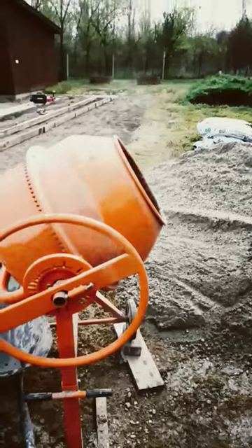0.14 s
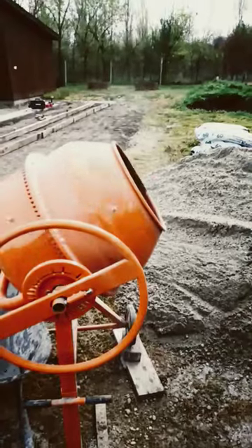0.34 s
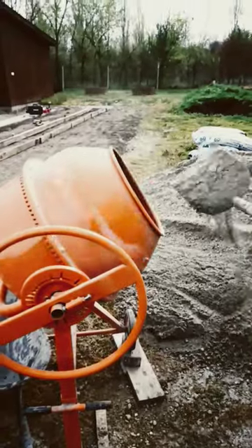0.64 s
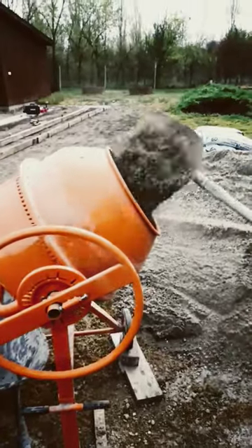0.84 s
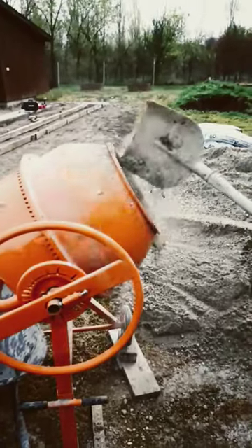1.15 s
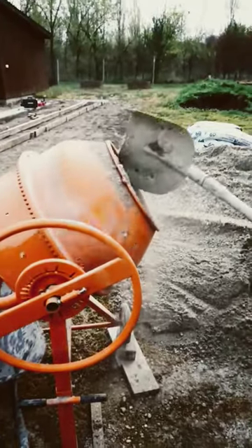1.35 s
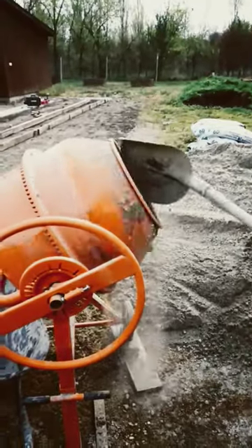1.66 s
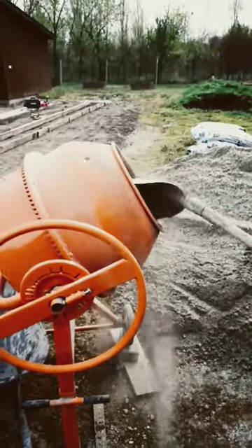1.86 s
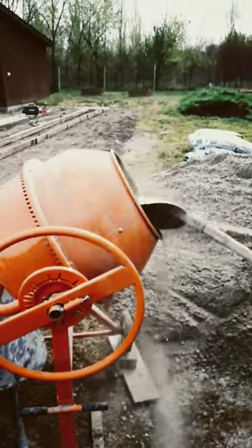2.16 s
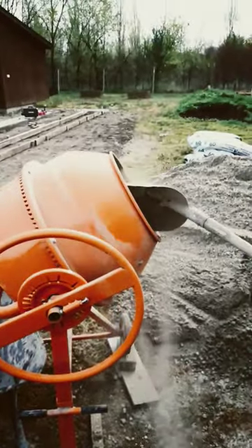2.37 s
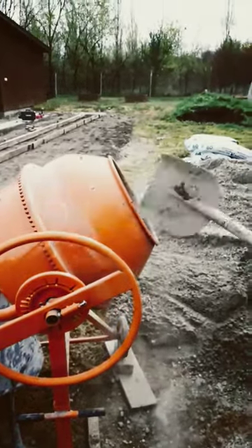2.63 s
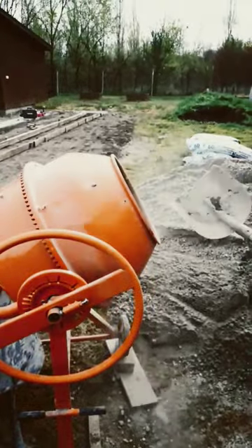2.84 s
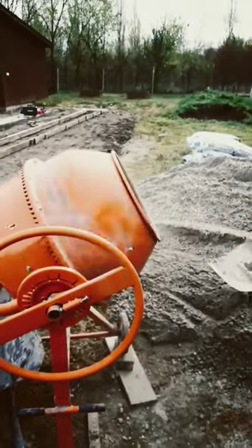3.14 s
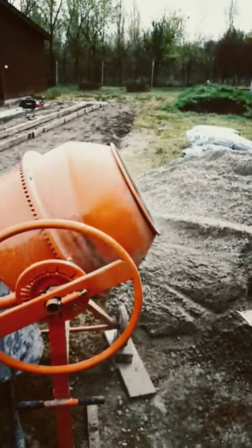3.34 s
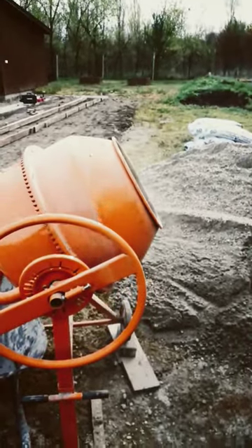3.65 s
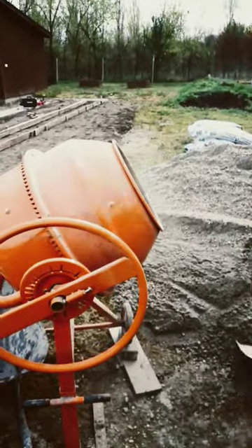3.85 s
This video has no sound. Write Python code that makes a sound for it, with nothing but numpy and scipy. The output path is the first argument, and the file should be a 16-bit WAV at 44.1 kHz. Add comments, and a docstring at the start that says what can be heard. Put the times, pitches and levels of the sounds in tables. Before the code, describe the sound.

A concrete mixer rattles and hums steadily while a shovel knocks its steel rim

```python
"""After a short silence a rattling, humming concrete mixer fades in; it runs in a yard, heard muffled.
Gear teeth, about 64 a second, click into the ringing steel drum and shake loose bursts of noise.
The hum is sine waves at multiples of the tooth rate, plus noise ringing in the drum's belly.
Stones tick (noise bursts), the load thuds (low sine), a shovel knocks the rim (ringing drum tones).
Thin hiss and bright ticks of grit sit on top; at the very end the sound turns bright and grainy."""
import sys
import numpy as np
from scipy import signal
from scipy.fft import rfft, irfft
from scipy.io import wavfile
from scipy.ndimage import uniform_filter1d

SR = 44100
rng = np.random.default_rng(int(sys.argv[2]) if len(sys.argv) > 2 else 0)


def int16_out(signal):
    """Quantize to a 16-bit WAV file."""
    q = np.round(np.clip(np.atleast_2d(signal).T, -1, 1) * 32767)
    wavfile.write(sys.argv[1], SR, q.astype(np.int16))


N = 176400  # 4 s of samples


def undb(db):
    """Turn decibels into a plain multiplier."""
    return 10 ** (np.asarray(db) / 20)


def level(x, db=0):
    """Scale a sound so that its rms, its average strength, is db."""
    return x * undb(db) / np.sqrt(np.mean(x ** 2))


def curve(rows):
    """Gain over time, drawn straight in dB between (start_s, level_db) rows."""
    rows = np.array(rows)
    return undb(np.interp(np.arange(N) / SR, rows[:, 0], rows[:, 1]))


def walk(rate):
    """Random levels held 1 / rate s, smoothed twice, without slow drift; spread near 1."""
    hold = int(SR / rate)
    steps = np.repeat(rng.standard_normal(N // hold + 1), hold)
    smooth = uniform_filter1d(uniform_filter1d(steps, hold), hold)[:N]
    return 1.22 * (smooth - uniform_filter1d(smooth, 8 * hold))


def colour(x, rows):
    """Filter with the gains of (pitch_hz, level_db) rows, never sounding ahead of its input."""
    rows = np.array(rows)
    hz = np.maximum(np.fft.rfftfreq(4096, 1 / SR), 1)
    gain_db = np.interp(np.log(hz), np.log(rows[:, 0]), rows[:, 1])
    # folding the cepstrum (the spectrum of the log gain) puts the whole response after time zero
    cepstrum = irfft(np.log(undb(gain_db)))
    cepstrum[1:2048] *= 2
    cepstrum[2049:] = 0
    return signal.fftconvolve(x, irfft(np.exp(rfft(cepstrum))))[:N]


def band(x, hz, width_hz):
    """One resonance: it rings at hz, and longer the narrower it is."""
    return signal.lfilter(*signal.iirpeak(hz, hz / width_hz, SR), x)


def bursts(rows, decay_s):
    """Noise that jumps up at each (start_s, level_db) and dies away."""
    kicks = np.zeros(N)
    for start_s, db in rows:
        kicks[min(int(start_s * SR), N - 1)] += undb(db)
    fading = signal.lfilter([1], [1, -np.exp(-1 / (decay_s * SR))], kicks)
    return fading * rng.standard_normal(N)


# How strong the hiss is at each pitch: pitch_hz [Hz], level_db [dB]
HISS_COLOUR = [(3000, 3), (9000, 3.5), (12500, -2), (14000, -8.5), (15200, -5.5)]
HISS_DB = -82  # before colouring


def hiss():
    """Thin steady noise, mostly treble, with a slight flicker in level."""
    flicker = undb(HISS_DB + 1.7 * walk(60))
    return flicker * colour(rng.standard_normal(N), HISS_COLOUR)


# Bright ticks of grit on steel: start_s [s], pitch_hz [Hz], level_db of the noise burst [dB]
TICKS = [(.743, 7350, -62), (1.590, 7500, -65), (1.673, 8850, -63.5), (1.674, 6700, -58),
         (2.231, 12410, -71), (2.351, 8800, -71), (2.35, 5700, -42.5), (2.352, 11500, -75),
         (2.531, 9500, -76)]
TICK_S, TICK_Q = 0.0052, 9.2  # burst decay; sharpness of the resonance


def ticks():
    """Each tick is a short noise burst ringing a narrow resonance high in the treble."""
    out = 0
    for start_s, hz, db in TICKS:
        burst = bursts([(start_s, db)], TICK_S)
        ring = band(band(burst, hz, hz / TICK_Q), hz, hz / TICK_Q)
        out = out + np.sqrt(SR * TICK_Q / hz) * ring  # makes up for what the narrow band removes
    return out


# How strong the bright rush is at each pitch: pitch_hz [Hz], level_db [dB, relative]
RUSH_COLOUR = [(500, -41), (1500, -24), (3000, -6), (4500, -7.5), (7000, -18.5), (8200, -34), (11000, -34),
               (15500, -44)]
RUSH_S, RUSH_RISE_S, RUSH_DB = 3.961, 0.021, -28.5  # start, rise time, rms level before the rise


def rush():
    """The sound suddenly turns bright and grainy, like gravel: coloured noise with a fast flicker."""
    since_s = np.arange(N) / SR - RUSH_S
    grains = rng.standard_normal(N) * undb(1.6 * walk(250))
    rise = (since_s > 0) * np.clip(0.6 + 0.4 * since_s / RUSH_RISE_S, 0, 1)  # jumps to 0.6 first
    return level(colour(grains, RUSH_COLOUR), RUSH_DB) * rise


# Single stones hitting the wall, strong and faint: start_s [s], level_db of the burst [dB, relative]
STONES = [(0.4234, -27.5), (0.5377, -37), (0.7494, -36), (0.9712, -23), (1.2246, -25), (1.4192, -26.5),
          (1.6794, -37), (2.1869, -41), (2.2832, -39.5), (2.4369, -42), (2.5341, -34), (2.6304, -36),
          (2.6773, -39), (2.7571, -48.5), (2.817, -25), (2.8988, -49), (3.1822, -24.5), (3.2779, -39),
          (3.7863, -32)]
# How strong a stone is at each pitch: pitch_hz [Hz], level_db [dB]
STONE_COLOUR = [(300, -42), (1500, -31), (3000, 4.5), (4500, -4.5), (6000, -14.5), (7500, -22.5),
                (15000, -31.5)]
STONE_S, PEBBLES_PER_S = 0.01, 90  # burst decay; how crowded the patter is
PEBBLE_DB, PEBBLE_SPREAD_DB = -52, 7.5  # quietest pebble, and the range above it


def stones():
    """Single stones and a random patter of pebbles tick on the wall as short noise bursts."""
    chance = rng.random((int(PEBBLES_PER_S * N / SR), 2))
    pebbles = [(when * N / SR, PEBBLE_DB + PEBBLE_SPREAD_DB * size) for when, size in chance]
    return 1.43 * colour(bursts([*STONES, *pebbles], STONE_S), STONE_COLOUR)


# Thuds of the load falling in the drum: start_s [s], length_s of rise and fall [s], level_db [dB]
THUDS = [(0.85, 0.1, -34), (1.128, 0.083, -37), (1.246, 0.087, -38.5), (1.933, 0.19, -38),
         (2.24, 0.095, -32), (2.532, 0.025, -35), (3.689, 0.12, -34.5)]
THUD_HZ, THUD_WANDER_HZ = 112.7, 6.3  # middle pitch, spread of its wander


def thuds():
    """The load drops and the frame booms low: a sine of wandering pitch under smooth swells."""
    t = np.arange(N) / SR
    swell = 0
    for start_s, length_s, db in THUDS:
        middle_s = start_s + length_s / 2
        swell = swell + undb(db) * np.exp(-((t - middle_s) / (0.45 * length_s)) ** 2)
    pitch = THUD_HZ + THUD_WANDER_HZ * walk(15)
    return swell * np.sqrt(2) * np.sin(2 * np.pi * np.cumsum(pitch) / SR)


# Shovel knocks on the rim: start_s [s], level_db (rms of the ring's first 20 ms) [dB],
# crack_db above that, before colouring [dB], lift_db of the upper tones [dB], boom_db [dB],
# free (share of the free ring time) [0-1]
KNOCKS = [(.864, -22.5, 6.5, -4.5, 5, 0.71), (.875, -29, -12, -19, 8, 0.75),
          (1.944, -30, -3, -12, 2.5, 0.72), (2.016, -23, -4, 4, 7, 0.94), (2.232, -24, -18, -5, -12, 0.52),
          (2.310, -22, -4.5, 4, -10.5, 0.41), (2.346, -28.5, -11, 2, 0.5, 0.48),
          (2.278, -33.5, -8, -3, -5, 0.78), (2.363, -31.5, -19, 2, -13, 0.9)]
# Tones of the knocked drum: pitch_hz [Hz], level_db [dB, relative], t60_s to fade by 60 dB [s]
DRUM = [(179, -3, 0.13), (229, -5.5, 0.064), (286, 1.5, 0.1), (367.7, 0.5, 0.22), (412, -7, 0.15),
        (463, 0.5, 0.032), (640, 0.5, 0.096), (734, -3, 0.044), (815, -3, 0.2), (896, -5.5, 0.072),
        (980, -0.5, 0.085), (1053, -11, 0.11), (1320, -13.5, 0.022), (1410, -11.5, 0.043)]
# How strong the opening crack is at each pitch: pitch_hz [Hz], level_db [dB]
CRACK_COLOUR = [(300, -22), (1200, -32), (2400, 9.5), (3100, 12.5), (4000, -8.5), (5300, -3), (7500, -27.5),
                (10000, -22), (15000, -16)]
KNOCK_CONTACT_S, FIRST_TOUCH, CRACK_S = 0.0048, 3, 0.0073  # decay, size of first touch, crack decay
KNOCK_SAG, SAG_S = .03, .012  # tones start this share sharp and sink with this time constant
UPPER_MODES_HZ, KNOCK_SPREAD_DB = 570, 1.2  # where lift_db begins; random spread of each tone
BOOM_HZ, BOOM_T60_S = 112, 0.053


def knocks():
    """A shovel on the rim: a noisy crack, and a rough contact that rings the drum's tones."""
    out, t = np.zeros(N + SR), np.arange(SR // 2) / SR
    cracks = []
    for start_s, db, crack_db, lift_db, boom_db, free in KNOCKS:
        cracks.append((start_s, db + crack_db))
        modes = [(hz, g + lift_db * (hz > UPPER_MODES_HZ), t60 * free) for hz, g, t60 in DRUM]
        blow = 0
        for hz, mode_db, t60 in modes + [(BOOM_HZ, boom_db, BOOM_T60_S)]:
            contact = rng.standard_normal(2000) * np.exp(-t[:2000] / KNOCK_CONTACT_S)
            contact[:8] += FIRST_TOUCH * rng.choice([-1, 1])
            bent_t = t + KNOCK_SAG * SAG_S * (1 - np.exp(-t / SAG_S))
            tone = np.sin(2 * np.pi * hz * bent_t) * undb(-60 * t / t60)
            ring = signal.fftconvolve(tone, contact)[:len(t)]
            tone_db = mode_db + KNOCK_SPREAD_DB * rng.standard_normal()
            blow = blow + ring / np.abs(ring).max() * undb(tone_db)
        first = int(start_s * SR)
        out[first:first + len(t)] += blow / np.std(blow[:SR // 50]) * undb(db)
    body = signal.sosfilt(signal.butter(4, 85, "high", fs=SR, output="sos"), out[:N])
    return body + colour(bursts(cracks, CRACK_S), CRACK_COLOUR)


HUSH_DB, HUSH_S = -6.5, 0.01  # depth and length of the dip


def hush():
    """Gain that sinks for a moment before each knock."""
    t = np.arange(N) / SR
    return undb(sum(HUSH_DB * (t < s) * np.exp(-((t - s) / HUSH_S) ** 2) for s, *_ in KNOCKS))


# The gear slackens, then the teeth slam home: start_s [s],
# dip_db just before (above 0 is a lift) [dB], jump_db just after [dB]
SLAMS = [(1.083, -6, 2), (1.131, -0.5, 5), (1.35, -10.5, -0.5), (1.846, 1.5, 14), (2.721, -3, 3),
         (2.99, -6, 4), (3.067, 2, 5.5), (3.411, -8.5, 7), (3.613, 2.5, 7.5)]
SLACK_S, SLAM_S = .02, .016  # how long the change before and the jump after last
TOOTH_HZ = 63.45  # teeth per second, before rounding to whole teeth between slams


def slams():
    """Gain that mostly sinks as the gear slackens and jumps as its teeth slam home."""
    t = np.arange(N) / SR
    gain_db = 0
    for s, dip_db, jump_db in SLAMS:
        before = dip_db * np.exp(-((t - s) / SLACK_S) ** 2)
        after = jump_db * np.exp(-abs(t - s) / SLAM_S)
        gain_db = gain_db + np.where(t < s, before, after)
    return undb(gain_db)


def teeth():
    """Running count of teeth passed; every slam falls on a whole count."""
    s = np.array([-1, *[row[0] for row in SLAMS], 5])
    counts = np.cumsum(np.round(np.diff(s, prepend=-1) * TOOTH_HZ))
    return np.interp(np.arange(N) / SR, s, counts) - np.round(TOOTH_HZ) + 2


# Tones of the hum: multiple of the tooth rate [count], level_db [dB, relative]
HUM = [(1, -33), (2, -8.5), (3, -7), (4, 1), (5, -15)]
# Loudness of the hum over time: start_s [s], level_db [dB]
HUM_LEVEL = [(.25, -25.5), (.44, -28.5), (.6, -34.5), (.72, -37.5), (.79, -31.5), (.88, -42), (1.0, -35),
             (1.15, -29.5), (1.22, -35), (1.3, -34.5), (1.38, -35.5), (1.46, -32.5), (1.6, -39),
             (1.68, -31), (1.77, -37), (1.9, -35.5), (2.07, -39), (2.15, -33), (2.23, -43), (2.32, -29.5),
             (2.42, -41.5), (2.6, -39), (2.75, -34), (2.9, -34.5), (3.03, -38.5), (3.17, -31), (3.27, -39),
             (3.38, -33.5), (3.46, -39.5), (3.53, -34), (3.64, -35), (3.79, -36.5), (3.88, -31.5),
             (3.99, -39)]
HUM_WOBBLE_DB, HUM_SLIP = 1.5, 0.62  # random spread of level, and of phase in radians
BELLY_HZ, BELLY_WIDTH_HZ, BELLY_DB = 260.1, 14, -3.5  # BELLY_DB is relative to the tones


def hum(turns):
    """Multiples of the tooth rate waver in level and phase; the drum's belly booms near the fourth."""
    lines = 0
    for multiple, db in HUM:
        loudness = undb(db + HUM_WOBBLE_DB * walk(10))
        lines = lines + loudness * np.sin(2 * np.pi * multiple * turns + HUM_SLIP * walk(11))
    noise = rng.standard_normal(N)
    belly = band(band(noise, BELLY_HZ, BELLY_WIDTH_HZ), BELLY_HZ, BELLY_WIDTH_HZ)
    return level(level(lines) + level(belly, BELLY_DB)) * curve(HUM_LEVEL)


# Resonances of the drum wall under the teeth: pitch_hz [Hz], width_hz [Hz], level_db [dB, relative]
WALL = [(744, 27, -8.5), (807, 70, 4.5), (895, 60, -3.5), (1038, 120, 5), (1266, 200, -12.5),
        (1615, 88, -0.5), (1854, 91, 5), (1988, 87, -5.5), (2154, 170, 4), (2374, 110, 2), (2493, 100, 4),
        (2770, 120, -0.5), (2979, 97, 3.5), (3238, 140, -4)]
RING_FLICKER_DB, UPPER_LAG_S = 4.5, .003  # the upper range speaks a little after the tooth
UPPER_HZ = 1466  # where the upper range begins


def wall_ring(clicks):
    """Tooth clicks set the drum wall ringing at its own pitches, each flickering in level."""
    ring = 0
    for k, (hz, width_hz, db) in enumerate(WALL):
        tone = level(band(band(clicks, hz, width_hz), hz, width_hz))
        late = np.roll(tone, int(UPPER_LAG_S * SR * (hz > UPPER_HZ)))
        # every other resonance is flipped in sign
        ring = ring + (-1) ** k * undb(db + RING_FLICKER_DB * walk(12)) * late
    return ring


# Gear rattle as the drum turns: start_s [s], level_db [dB], lift_db of the upper range [dB]
RATTLE = [(.4, -23, -2.5), (.5, -25.5, -1.5), (.6, -34, -1.5), (.7, -29, 1), (.82, -33, -0.5),
          (.92, -28, -2), (1.0, -26.5, 0), (1.14, -29, 2.5), (1.21, -25.5, 0.5), (1.28, -24.5, -2.5),
          (1.4, -29.5, 0.5), (1.5, -31, -2), (1.6, -32, 2.5), (1.7, -31.5, -2.5), (1.8, -30.5, -5),
          (1.9, -35, -5.5), (1.97, -30.5, -3.5), (2.07, -32, -4), (2.15, -30, -2), (2.27, -30.5, -3),
          (2.4, -31.5, -2.5), (2.5, -31, 0), (2.6, -31, 1.5), (2.75, -30.5, 3), (2.84, -28.5, 3),
          (2.88, -30.5, 3.5), (2.93, -26.5, 2.5), (3.05, -29, -1.5), (3.17, -30, 0.5), (3.3, -30.5, -2),
          (3.45, -32.5, -3.5), (3.6, -30, -5.5), (3.72, -31, -6), (3.82, -35, -4.5), (3.97, -28.5, -2)]
# How strong the rattle is at each pitch: pitch_hz [Hz], level_db [dB, relative]
RATTLE_COLOUR = [(25, -41), (60, -25.5), (110, -10), (160, -14.5), (300, -7.5), (400, -11.5), (540, -19),
                 (810, -13), (1280, -13.5), (2480, -11.5), (3300, -19.5), (4290, -27), (6000, -39.5),
                 (7600, -52.5), (10000, -63)]
TOOTH_JITTER, TOOTH_SCATTER_DB = 0.015, 2.2  # random spread of timing (tooth periods) and of strength
RATTLE_DECAY, TOOTH_RISE_S = 0.69, 0.0028  # decay in tooth periods; half the smoothing time
RATTLE_BED = 0.52  # steady noise under the tooth bursts
BED_SINK = .9  # the harder the teeth bite, the more they stand out of the steady bed
FLICKER_DB, SURGE_DB = 3, .6  # random spread of each narrow band, and of the whole
RING_DB, CLICK_DB = -1.5, -8.5  # wall ring and bare tooth click, relative to the shaken noise


def gear(turns):
    """Each tooth clicks into the wall resonances and shakes loose a short rattle."""
    chance = rng.standard_normal((int(turns[-1]) + 2, 2))
    counts = np.arange(len(chance)) + TOOTH_JITTER * chance[:, 0]
    times = np.interp(counts, turns, np.arange(N))
    clicks = np.zeros(N)
    clicks[times.astype(int)] = undb(TOOTH_SCATTER_DB * chance[:, 1])
    ring = wall_ring(clicks)

    bed = RATTLE_BED * level(curve(RATTLE)) ** -BED_SINK
    shaken = signal.lfilter([1], [1, -np.exp(-TOOTH_HZ / (RATTLE_DECAY * SR))], clicks)
    gate = uniform_filter1d(bed + shaken, int(2 * TOOTH_RISE_S * SR))
    shake = colour(gate * rng.standard_normal(N), RATTLE_COLOUR)

    # split the noise into narrow bands, each flickering on its own
    edges = [1, *np.arange(300, 7500, 160), 20000]
    spectrum, hz = rfft(shake), np.fft.rfftfreq(N, 1 / SR)
    shake = 0
    for low, high in zip(edges, edges[1:]):
        part = irfft(spectrum * ((hz >= low) & (hz < high)), N)
        shake = shake + part * undb(FLICKER_DB * walk(29.88))

    bare = level(colour(clicks, RATTLE_COLOUR), CLICK_DB)
    rattle = level(level(shake) + level(ring, RING_DB) + bare)
    lower = signal.sosfiltfilt(signal.butter(2, UPPER_HZ, fs=SR, output="sos"), rattle)
    rattle = lower + (rattle - lower) * curve(np.array(RATTLE)[:, [0, 2]])
    return rattle * curve(RATTLE) * undb(SURGE_DB * walk(25.27))


MUFFLE_HZ, SPILL_DB = 6820, -39.5  # treble cut of the mixer; level of the unmuffled copy


def scene():
    """The mixer is heard muffled, with little treble; the hiss, ticks and rush are not."""
    turns = teeth()
    running = (gear(turns) * slams() + hum(turns)) * hush()
    mixer = running + knocks() + thuds() + stones()
    muffled = signal.sosfilt(signal.butter(8, MUFFLE_HZ, fs=SR, output="sos"), mixer)
    muffled = muffled + undb(SPILL_DB) * mixer
    return (muffled + hiss() + ticks() + rush())[None]


START_S, FADE_S, FADE_FROM_DB, FADE_BEND = 0.17, 0.48, -26.5, 2.09  # silence, fade, its first gain, bend
LOW_CUT_HZ, TOP_HZ = 48, 15500


def record(dry):
    """The microphone drops the deep bass; the sound fades in after silence; the top is cut."""
    left = np.clip(1 - (np.arange(N) / SR - START_S) / FADE_S, 0, 2)  # share of the fade still to go
    fade = (left <= 1) * undb(FADE_FROM_DB * left ** FADE_BEND)
    dry = signal.sosfilt(signal.butter(1, LOW_CUT_HZ, "high", fs=SR, output="sos"), dry)
    return signal.sosfilt(signal.ellip(8, .2, 70, TOP_HZ, fs=SR, output="sos"), dry * fade)


dry = scene()
out = record(dry)
int16_out(out)
```